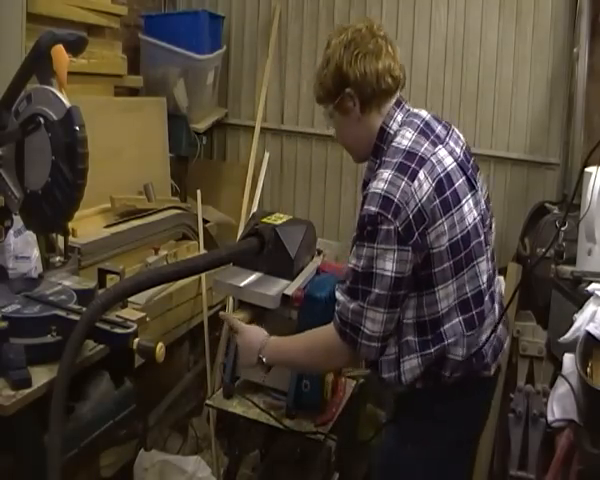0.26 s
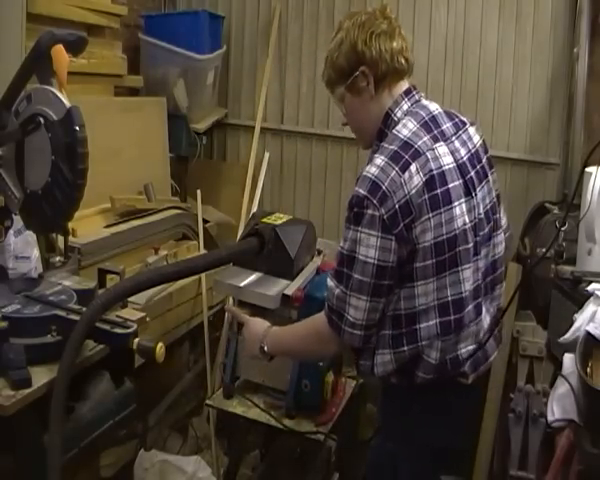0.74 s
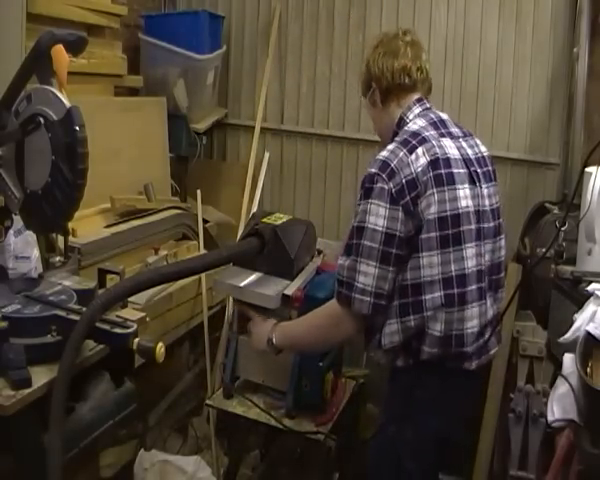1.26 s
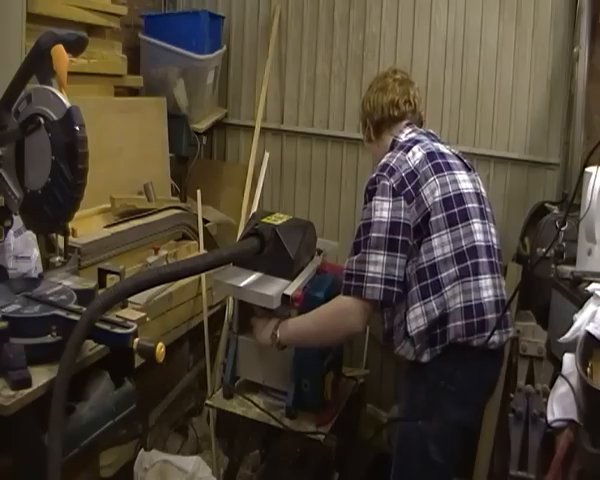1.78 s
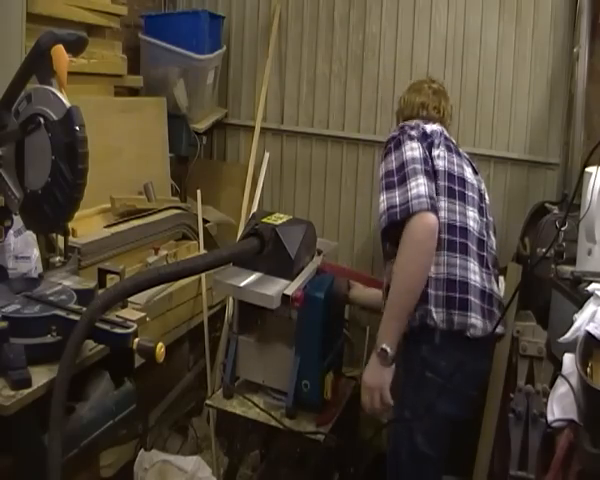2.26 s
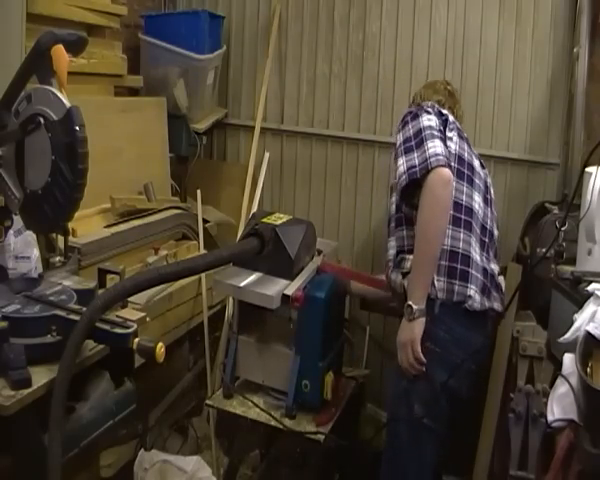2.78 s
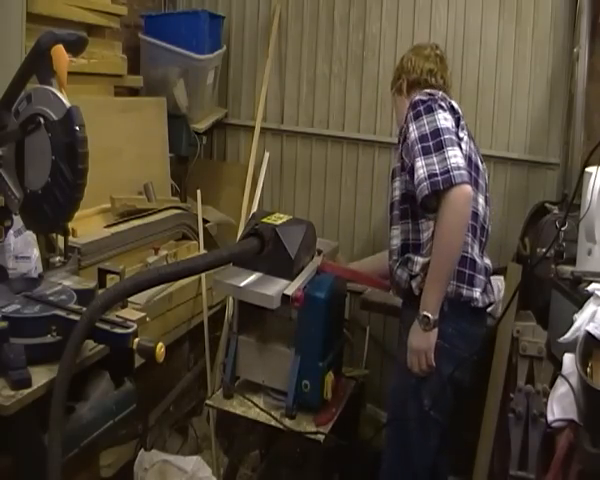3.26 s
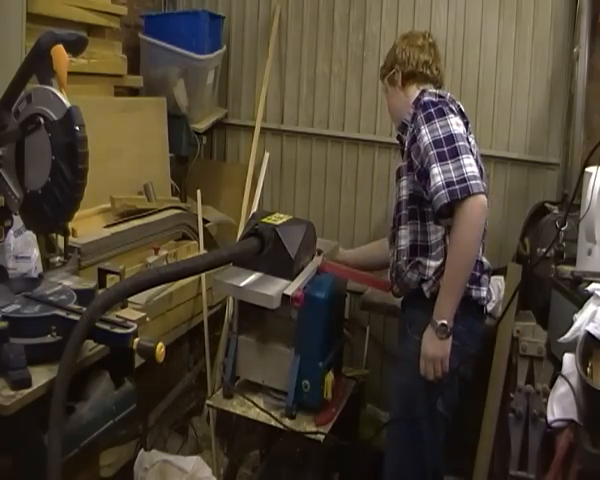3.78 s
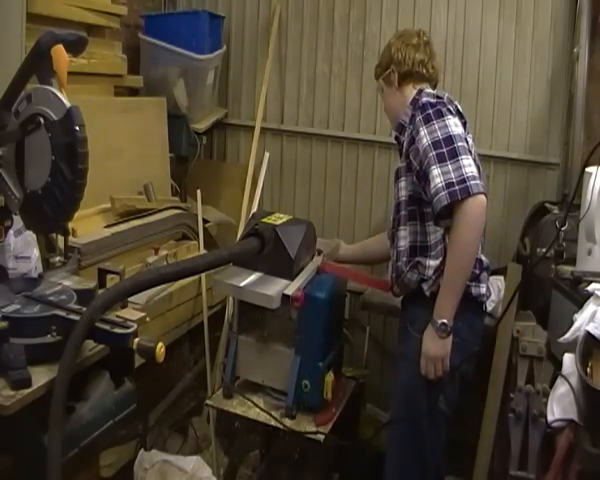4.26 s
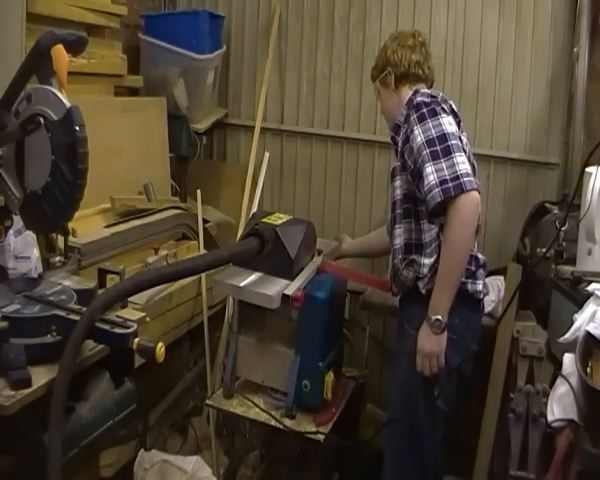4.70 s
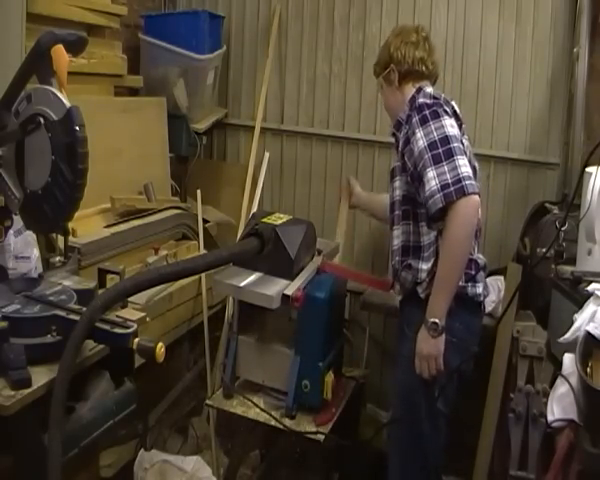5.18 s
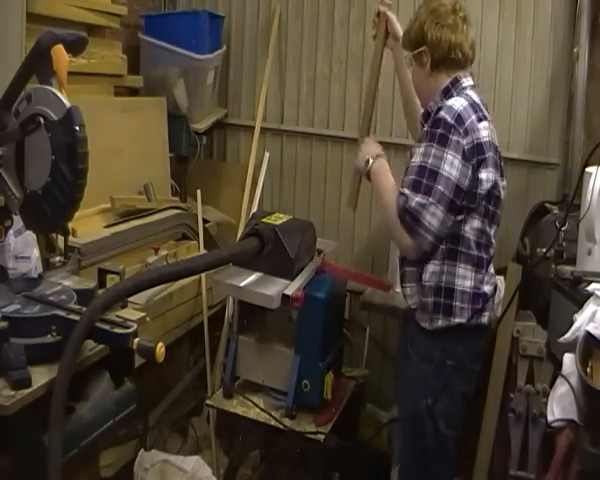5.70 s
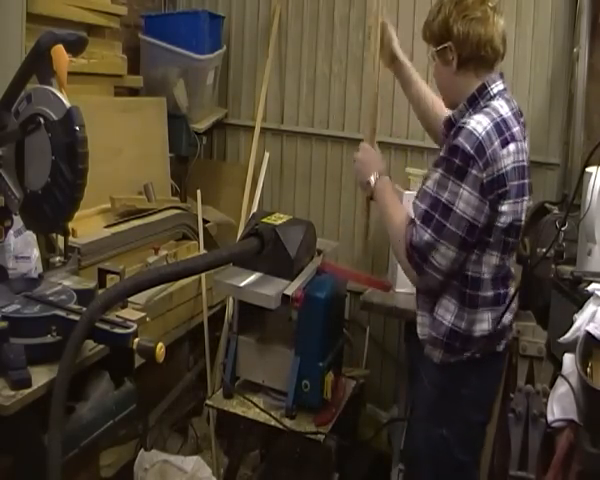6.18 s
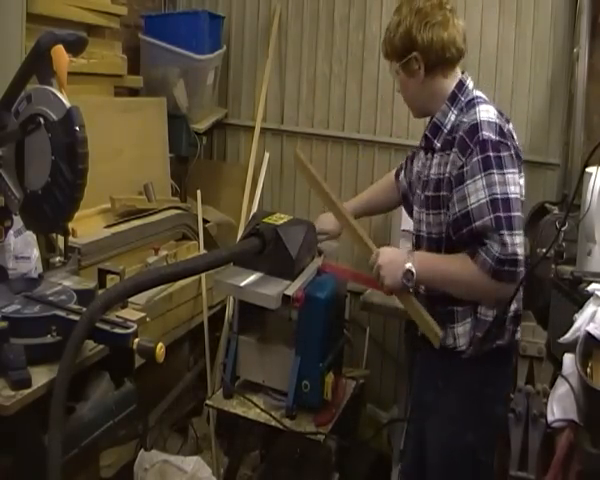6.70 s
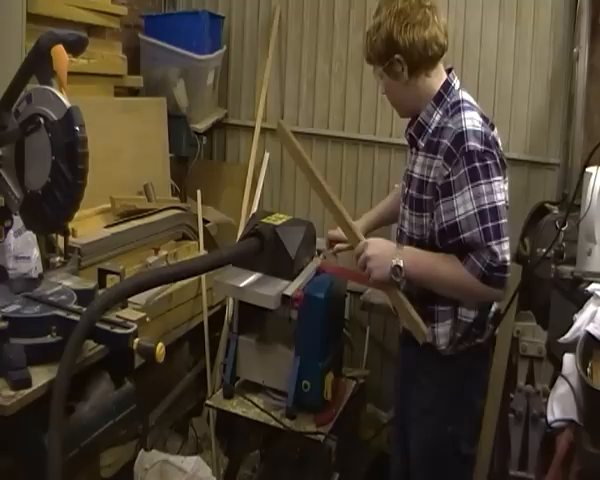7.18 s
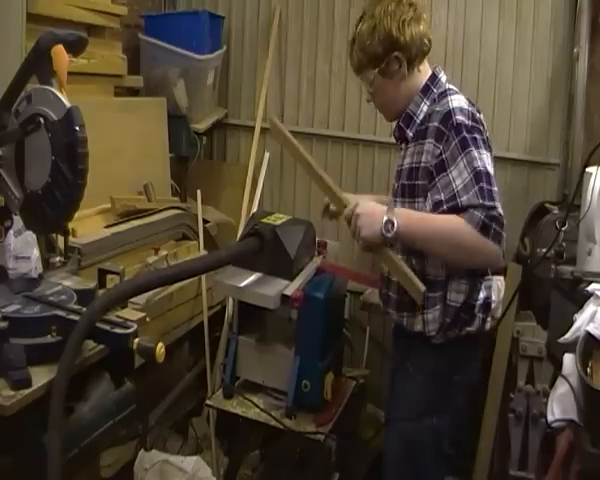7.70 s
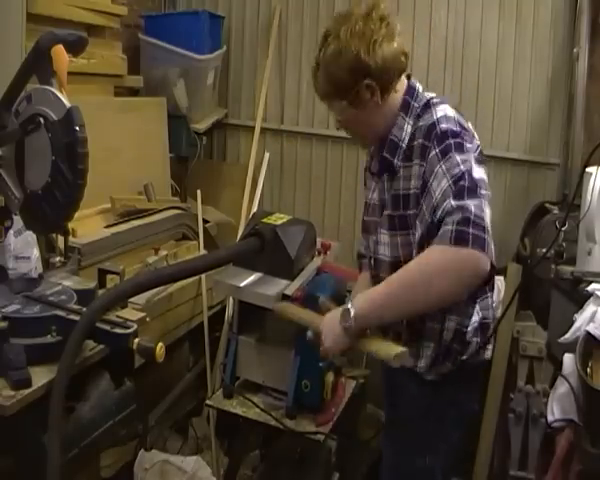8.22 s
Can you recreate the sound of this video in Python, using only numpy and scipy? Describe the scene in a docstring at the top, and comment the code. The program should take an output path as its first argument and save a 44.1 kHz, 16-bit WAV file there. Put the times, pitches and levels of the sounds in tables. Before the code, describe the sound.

Loud siren-like planer with harsh chip-tearing buzz and steady vacuum rush; near the middle the cutting stops abruptly and the freed cutter winds up slightly.

```python
"""In a small workshop, a benchtop planer and a shop vacuum run together.
The planer's spinning block has two knives and howls like a siren, because it chops the air twice a turn.
While a board is in the cut the block turns slower, and each knife blow rasps, rings the wood and tears chips.
The board leaves at 4.7 s and the block spins up again. Behind it the vacuum motor hums,
air rushes through hood, hose and fans (coloured noise), and low tones hum under the machines."""
import sys
import numpy as np
from scipy import signal
from scipy.fft import rfft, irfft
from scipy.io import wavfile

SR = 44100
rng = np.random.default_rng(int(sys.argv[2]) if len(sys.argv) > 2 else 0)


def unload_wav(signal):
    """Save mono or channel-first audio to the path in sys.argv[1] as 16-bit WAV at rate SR, clipped to [-1, 1]."""
    wavfile.write(
        sys.argv[1],
        SR,
        np.round(np.clip(np.atleast_2d(signal).T, -1, 1) * 32767).astype(np.int16),
    )


N = 372644
TIME = np.arange(N) / SR
FREQ = np.maximum(np.arange(N // 2 + 1) * SR / N, 1)
LEFT_RIGHT = np.array([[1], [-1]])
EXIT_S = 4.7  # the board leaves the knives

# An "order" is how many times a tone repeats in one turn of its shaft.
# Shake of the unbalanced block (order 1), air chopped by the knives (orders 2 to 10), and a tone
# an octave below the motor whine (order 16), before room lifts and fades: order, level_db
PLANER_TONES = [(1, -43), (2, -30.5), (4, -21.5), (6, -19.5), (8, -35), (10, -41.5), (16, -47.5)]
# Fainter tones of the block and its drive, around which each level wanders: order, level_db
DRIVE_TONES = [(3, -38), (11, -43), (12, -41), (18, -44), (19, -41), (20, -35.5), (22, -45)]
# The howl swells or fades as the worker and the board move around the machine:
# middle_s, order, change_db, length_s
HOWL_FADES = [(0.647, 4, 2.5, 0.75), (1.25, 6, -4.5, 0.53), (2.05, 4, -8, 1), (3, 2, -3, 1.5),
              (3.897, 4, -2, 1.2), (4.2, 6, 2.5, 0.39)]
WHINE_FREE_DB, WHINE_LOADED_DB = -34.5, -28.5  # motor whine, before the room lifts it
WHINE_ORDER = 31.9  # whine cycles per motor turn


def cutter_block(hz, turns, bite_db):
    """Two knives pass the lips each turn, so low even orders howl; the motor whines far above them."""
    levels = {round(order): db + standing_db(round(order) * hz) for order, db in PLANER_TONES}
    for middle_s, order, change_db, length_s in HOWL_FADES:
        levels[round(order)] = levels[round(order)] + change_db * swell(middle_s, length_s)
    shake = undb(levels.pop(1)) * tone(turns, 1, flutter=0.29)

    # the howl, and the tone below the whine
    even_tones = 0
    for order, db in levels.items():
        gain = undb(db + 0.5 * walk(0.83))
        even_tones = even_tones + gain * tone(turns, order, flutter=0.0096 * order)

    drive = 0
    for order, db in DRIVE_TONES:
        drive = drive + undb(db + 2.8 * walk(0.79)) * tone(turns, round(order), flutter=0.3)

    # the belt slips under load, so the motor gains a little on the block
    loaded = bite_db > -12
    motor_turns = turns + np.cumsum(hz * 0.002 * loaded) / SR
    load = np.minimum(undb(bite_db), 1)
    whine_db = WHINE_FREE_DB + (WHINE_LOADED_DB - WHINE_FREE_DB) * load
    whine_gain = undb(whine_db + standing_db(WHINE_ORDER * hz))
    whine = whine_gain * tone(motor_turns, WHINE_ORDER, flutter=0.32, flutter_rate=11)
    return even_tones + drive + shake + whine


# Speed of the block while the board is in the cut: time_s, speed_hz (turns per second)
CUTTING_SPEED = [(0, 159.77), (0.6, 159.3), (2.1, 159.8), (2.9, 159.4), (3.2, 159.6), (3.5, 161.6),
                 (3.75, 160.5), (4.55, 158.7), (4.7, 159.3)]
LOADED_HZ, FREE_HZ = 159.3, 169.8  # turns per second at the exit, and running free
SPIN_UP_S = 0.71  # time constant of the climb


def block_speed():
    """Turns per second: the board holds the block down, then it nears its free speed ever more gently."""
    free = FREE_HZ - (FREE_HZ - LOADED_HZ) * np.exp((EXIT_S - TIME) / SPIN_UP_S)
    return np.maximum(curves(CUTTING_SPEED)[0], free)


# Standing waves of the workshop, which the planer's tones sweep through: pitch_hz, width_hz, lift_db
STANDING_WAVES = [(164.6, 3.5, 6), (324.5, 3.2, -11), (338.4, 8, 12), (658.6, 11.3, 6.5), (678, 5, 5.5),
                  (976, 9, -10.5), (1003, 10, -3), (1011, 5.4, 3.5), (1304, 7.8, 10), (1340.7, 16, 11),
                  (1668, 26, 12.5), (2695, 37, 17.5), (5230, 40, -2), (5398, 10, 5)]


def standing_db(hz):
    """Lift or dip that the workshop's standing waves give a tone of this pitch."""
    return sum(db * np.exp(-((hz - centre) / width) ** 2) for centre, width, db in STANDING_WAVES)


# Knife blows on the board, before bite, snipe and wander change them: order, level_db
KNIFE_BLOWS = [(3, -44), (5, -32), (7, -34), (9, -38), (10, -32), (11, -39), (12, -34), (13, -34),
               (14, -35), (15, -34), (16, -32), (17, -38), (18, -35), (19, -35), (20, -36), (21, -38),
               (22, -36), (23, -41), (24, -42), (25, -37), (26, -39), (28, -42), (29, -41), (30, -40),
               (31, -44), (33, -43), (34, -36), (35, -43), (37, -43)]
# A mode of the moving board meets an order and sings out; the order 32 row is a brief swell
# of the motor whine: middle_s, order, level_db, length_s
SINGING_TONES = [(.05, 13, -23, 0.19), (.36, 20, -25.5, 0.32), (0.385, 16, -26, 0.36), (.55, 34, -27, .18),
                 (.65, 13, -26.5, 0.46), (0.84, 14, -18, 0.16), (1.11, 34, -25, 0.27),
                 (2.03, 12, -29, 0.35), (2.78, 16, -27, 0.32), (3.686, 20, -22.5, 0.14),
                 (3.702, 32, -24, 0.11), (4.068, 34, -26, 0.22), (4.08, 17, -21.5, 0.19),
                 (4.15, 12, -23, .5), (4.298, 21, -21.5, 0.23), (4.42, 15, -23, 0.39),
                 (4.547, 10, -25, 0.18), (4.627, 20, -19, 0.18), (4.65, 12, -26, .17),
                 (4.657, 17, -19, .15)]
# Colour of tearing fibres and flying chips, only the shape matters: pitch_hz, level_db
CHIP_COLOUR = [(100, -43), (300, -4.5), (550, 2.5), (820, -2), (1250, -9), (2000, -15), (3200, 1),
               (4400, 8), (5200, -3), (6500, -1), (7800, 3), (9500, -4), (12000, -27)]
RASP_DB, CHIPS_DB = -0.5, -27  # rasp shift, and chip level at a bite of 0 dB
# the tail of the board tips into the knives just before it leaves, and the blows ring harder
SNIPE_AT_S, SNIPE_LENGTH_S, SNIPE_DB = 4.65, 0.11, 5
# the loose end of the board chatters once it has left the infeed roller
CHATTER_FROM_S, CHATTER_ATTACK_S, CHATTER_DB = 4.3, 0.35, -35


def cutting(turns, bite_db):
    """Knife blows repeat with the turn and ring the board; each tears off a burst of chips."""
    force_db = bite_db + RASP_DB + SNIPE_DB * swell(SNIPE_AT_S, SNIPE_LENGTH_S)
    # the board's modes shift as it feeds, so each order swells and fades on its own
    power = {}
    for order, db in KNIFE_BLOWS:
        power[round(order)] = undb(db + force_db + 1.5 * walk(0.92)) ** 2

    in_cut = np.minimum(undb(bite_db), 1) ** 2
    for middle_s, order, db, length_s in [*SINGING_TONES, *faint_sings(count=14)]:
        sing = in_cut * undb(db) ** 2 * swell(middle_s, length_s)
        power[round(order)] = power.get(round(order), 0) + sing
    # the blows, the singing tones and the swell of the whine
    tones = sum(np.sqrt(p) * tone(turns, order, flutter=0.23) for order, p in power.items())

    # one knife stands prouder than the other, and no two blows are alike
    blow = (2 * turns).astype(int)
    size = undb(1.1 * rng.standard_normal(N // 100)[blow] - 1.7 * (blow % 2))
    # a steady share, plus a burst that dies away over 0.2 of a turn
    burst = 0.79 + size * np.exp(-(turns % 0.5) / 0.2)
    chips = undb(CHIPS_DB + bite_db) * noise(spectrum(CHIP_COLOUR, FREQ), burst)

    loose = np.clip((TIME - CHATTER_FROM_S) / CHATTER_ATTACK_S, 0, 1)
    rattle = noise(resonance(hz=2900, width_hz=3800), burst)
    chatter = loose * undb(CHATTER_DB + release_db()) * rattle
    return tones + chips + chatter


def faint_sings(count):
    """Chance meetings of a board mode with one of the orders 10 to 22, as rows like SINGING_TONES."""
    level_db, length_s = -35, 0.28
    chances = rng.random((count, 2))
    return [(EXIT_S * when, 10 + 12 * which, level_db, length_s) for when, which in chances]


RELEASE_S, RELEASE_DB_PER_S = 0.014, 380  # wait after the exit, then speed of the fall


def release_db():
    """0 dB while the board is in the cut; after it leaves, the cut dies away fast in the room."""
    return -RELEASE_DB_PER_S * np.clip(TIME - EXIT_S - RELEASE_S, 0, 0.5)


# Suction motor: time_s, speed_hz (turns per second), level_db
VACUUM_MOTOR = [(0, 385.4, -20.5), (2.2, 386.5, -20), (3.5, 385.5, -20.5), (4.3, 385.8, -20.5),
                (4.75, 387.4, -22.5), (5.2, 385.7, -20), (6.8, 389.3, -22.5), (8.45, 387, -22)]
# Its main tone and overtones: order, change_db (added to the motor level)
VACUUM_TONES = [(1, 0.5), (3, -20.5), (6, -11.5), (7, -30.5)]


def vacuum():
    """The suction motor hums at its shaft rate, with a few overtones from the impeller."""
    hz, level_db = curves(VACUUM_MOTOR)
    turns = np.cumsum(hz) / SR
    tones = 0
    for order, change_db in VACUUM_TONES:
        tones = tones + undb(change_db) * tone(turns, round(order), flutter=0.052 * order)
    return undb(level_db) * tones


# Colour of the rush through hood, hose and fans, only the shape matters: pitch_hz, level_db
AIR_COLOUR = [(25, -32), (80, -32), (130, -25), (180, -13), (250, -12.5), (310, -3), (400, 1), (560, -7),
              (740, 0.5), (1150, -0.5), (2200, -1.5), (2750, -1.5), (3400, -0.5), (4400, 1.5), (5200, -1.5),
              (6700, -6), (8500, -4), (10800, -4.5), (12000, -11.5)]
# Resonances of hood, hose and housings that colour the rush: pitch_hz, width_hz, lift_db
HOLLOW_PARTS = [(636, 34, 8), (726, 23, 5), (905, 29, 2.5), (1355, 36, 1), (1455, 80, 3), (1820, 100, 2.5),
                (1950, 47, 2.5), (2540, 28, 4.5), (3180, 210, 2.5), (3240, 67, 0.5), (3890, 140, 2),
                (4350, 64, 0), (4880, 81, 1.5), (5700, 32, 2.5), (6260, 59, 1), (9830, 120, 0)]
# Loudness of the rush, which also wavers a little: time_s, level_db
AIR_LOUDNESS = [(0, -17.3), (1.2, -18.5), (3.3, -17.5), (4.2, -17), (4.75, -20), (5.15, -17.3), (6.4, -17),
                (7.3, -18.5)]


def air():
    """Turbulent rush, coloured by the hollow parts that it passes through."""
    colour = 1 + sum((undb(db) - 1) * resonance(hz, width) for hz, width, db in HOLLOW_PARTS)
    level_db = curves(AIR_LOUDNESS)[0] + 0.33 * walk(4.6)
    return undb(level_db) * noise(spectrum(AIR_COLOUR, FREQ) * colour)


# Low hum of the motors and their stand: base_hz (sounds at 0.98 of this), level_db
LOW_HUM = [(100, -66.5), (131, -63), (195, -63)]


def hum():
    """Low tones under the machines, steady in pitch and fluttering in size."""
    return sum(undb(db) * tone(hz * TIME, 0.98, flutter=0.3) for hz, db in LOW_HUM)


# Stereo width from the wall reflections; tones scale it further: pitch_hz, side_minus_mid_db
STEREO_WIDTH = [(40, -12), (160, -9), (350, -14), (520, -15), (750, -15.5), (1150, -17), (2070, -13.5),
                (3730, -12), (6730, -8), (12100, -7.5)]


def tone(turns, order, flutter, flutter_rate=18, spread=0.22):
    """One order of a shaft; turbulence shakes its size and phase, the walls shift it between the ears."""
    angle = (2 * np.pi * ((order * turns + rng.random()) % 1)).astype(np.float32)
    wave = (1 + flutter * walk(flutter_rate)) * np.sin(angle)
    wave = wave + flutter * walk(flutter_rate) * np.cos(angle)
    mean_hz = order * turns[-1] / TIME[-1]
    side = spectrum(STEREO_WIDTH, mean_hz) * (spread + flutter) * walk(4.3)
    return wave + LEFT_RIGHT * side * np.cos(angle)


def noise(gain, envelope=1):
    """Stereo noise, shaped in time, then coloured, then set to unit level; the treble is widest."""
    mid = irfft(rfft(envelope * rng.standard_normal(N)) * gain, N)
    side_gain = gain * spectrum(STEREO_WIDTH, FREQ)
    side = irfft(rfft(envelope * rng.standard_normal(N)) * side_gain, N)
    return (mid + LEFT_RIGHT * side) / mid.std()


def resonance(hz, width_hz):
    """Gain of a resonance that peaks at 1 and is `width_hz` wide at half height."""
    return 1 / (1 + ((FREQ - hz ** 2 / FREQ) / width_hz) ** 2)


def swell(middle_s, length_s):
    """A bell curve in time, `length_s` seconds wide at half height."""
    return 0.5 ** ((2 * (TIME - middle_s) / length_s) ** 2)


def walk(rate):
    """Smooth random wander of unit spread, with little movement above about `rate` Hz."""
    steps = rng.standard_normal(2048)
    slow = irfft(rfft(steps) * np.exp(-(np.arange(1025) / (10 * rate)) ** 2))
    return np.interp(TIME, np.linspace(0, 10, len(slow)), slow / slow.std())


def undb(db):
    """Decibels to gain."""
    return 10 ** (np.asarray(db) / 20)


def curves(table):
    """Each column of a time table, joined by straight lines."""
    seconds, *columns = np.transpose(table)
    return [np.interp(TIME, seconds, column) for column in columns]


def spectrum(table, hz):
    """Gain of a pitch and decibel table at the given frequencies."""
    points, db = np.transpose(table)
    return undb(np.interp(np.log(hz), np.log(points), db))


# How hard the knives bite, until the board leaves: time_s, bite_db
KNIFE_BITE = [(0, 2.5), (.3, 2), (1.15, 0.5), (1.6, 2.5), (2.25, 0.5), (2.8, 3), (3.15, -1.5), (3.4, -9),
              (3.62, 3.5), (3.9, 3), (4.2, 3.5), (4.47, 0.5)]


def scene():
    """Planer and vacuum running together, all layers added."""
    hz = block_speed()
    turns = np.cumsum(hz) / SR
    bite_db = curves(KNIFE_BITE)[0] + release_db()
    planer = cutter_block(hz, turns, bite_db) + cutting(turns, bite_db)
    return planer + vacuum() + air() + hum()


# Drift of the sound between the ears: time_s, left_minus_right_db
BALANCE = [(0, 0), (4, 0.3), (5.2, 1.4), (6.25, 1.4), (6.7, -1), (8.45, .1)]
TOP_HZ = 12050  # hardly anything is left above this


def record(dry):
    """The balance wanders a little; the highest peaks are clipped and the top is cut steeply."""
    balanced = dry * undb(curves(BALANCE)[0] * LEFT_RIGHT / 2)
    sound = np.clip(balanced, -0.88, 0.88)
    lowpass = signal.ellip(14, 0.2, 90, TOP_HZ, fs=SR, output="sos")
    return signal.sosfilt(lowpass, sound)


dry = scene()
out = record(dry)
unload_wav(out)
```